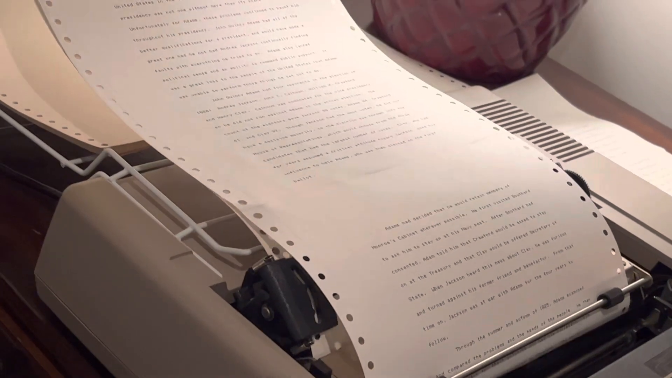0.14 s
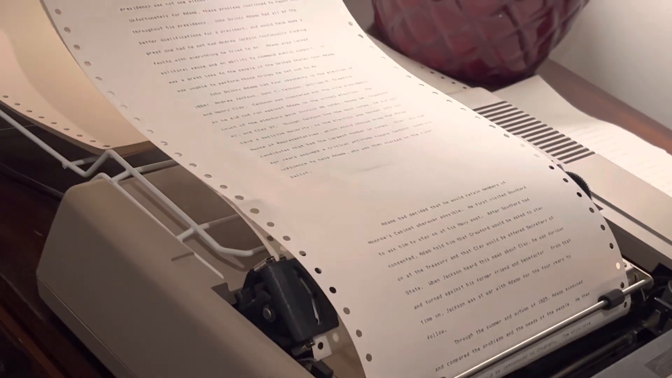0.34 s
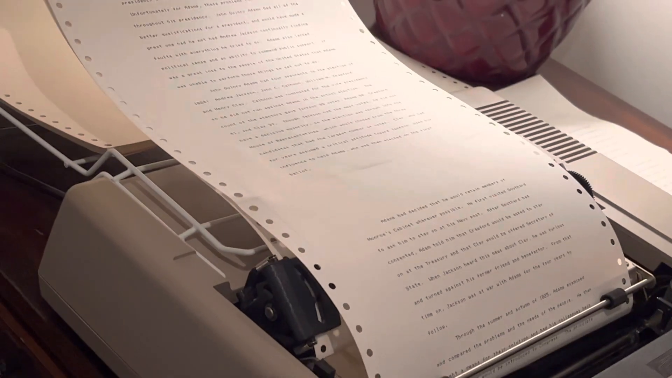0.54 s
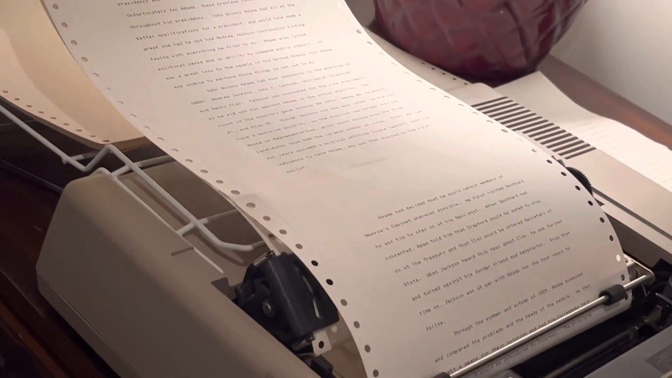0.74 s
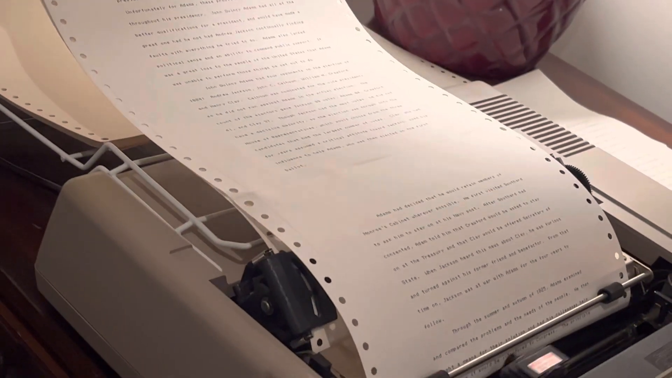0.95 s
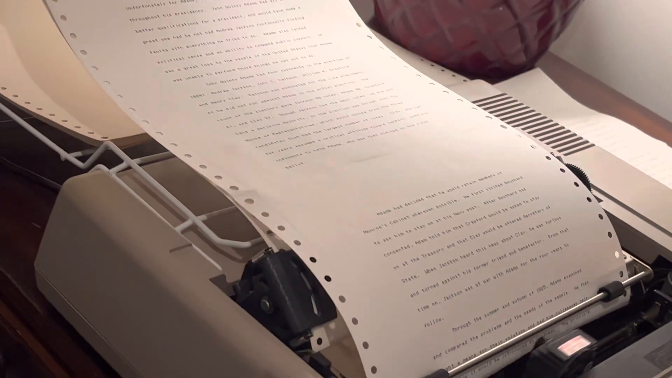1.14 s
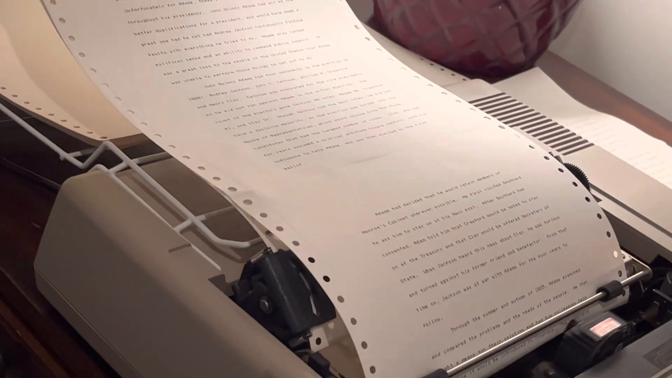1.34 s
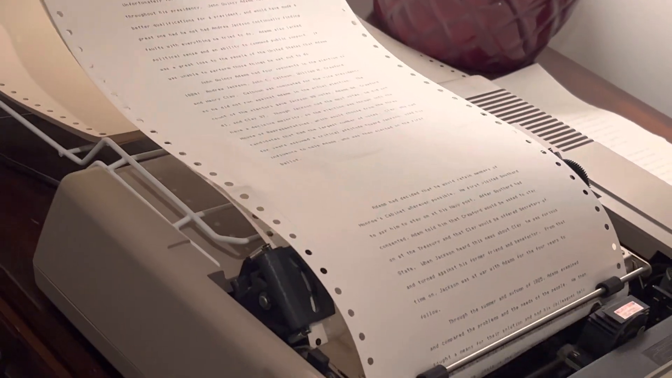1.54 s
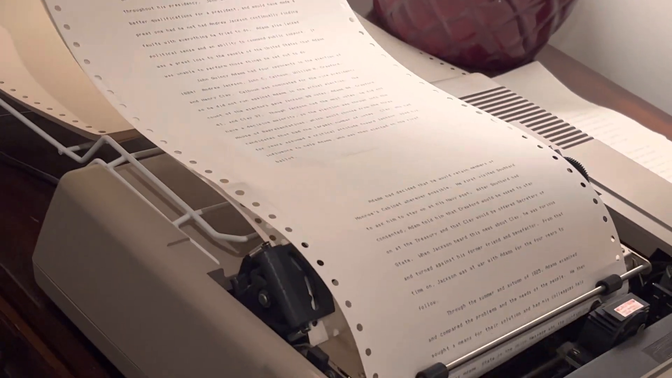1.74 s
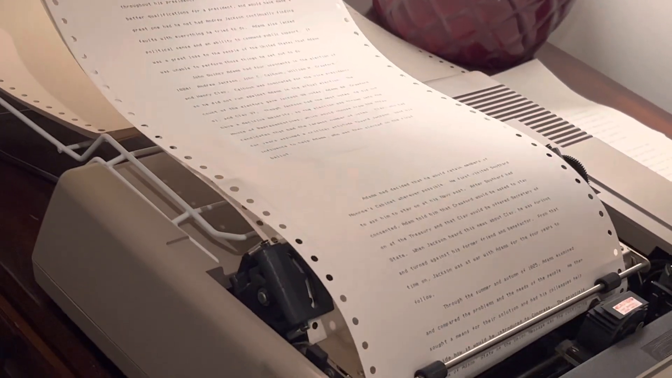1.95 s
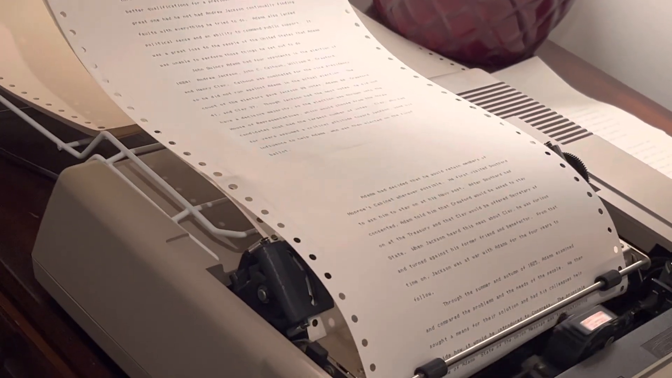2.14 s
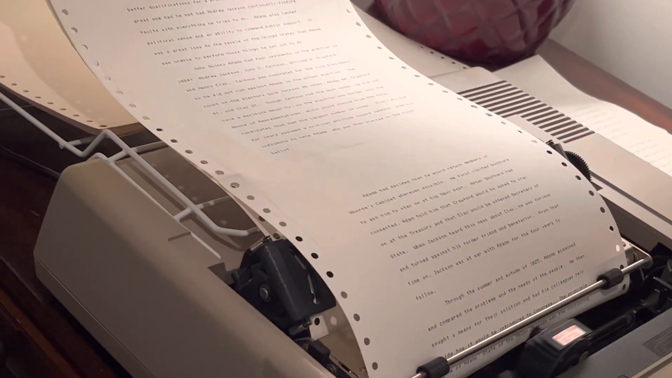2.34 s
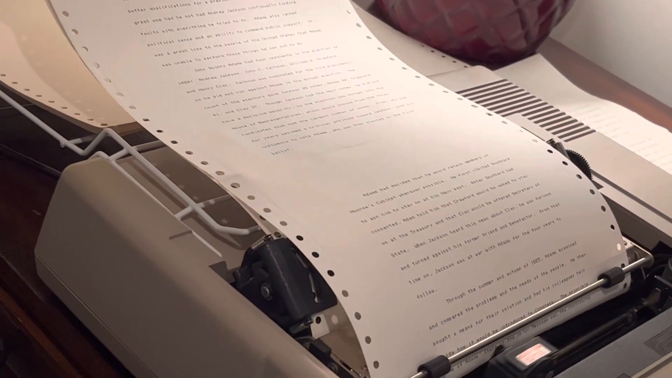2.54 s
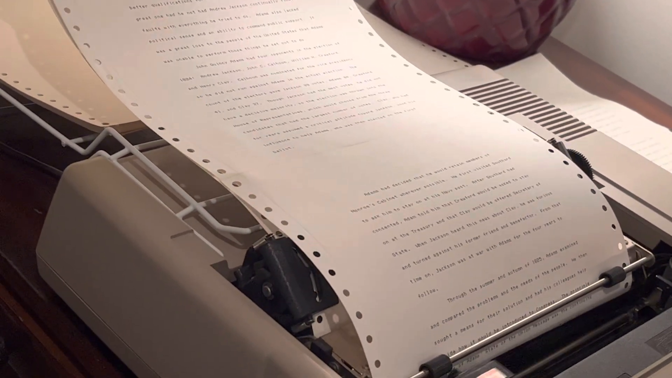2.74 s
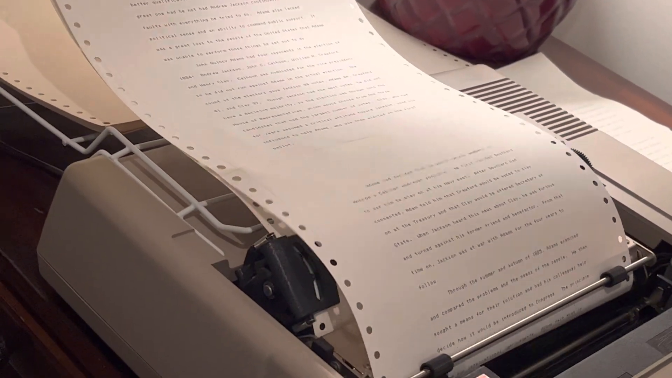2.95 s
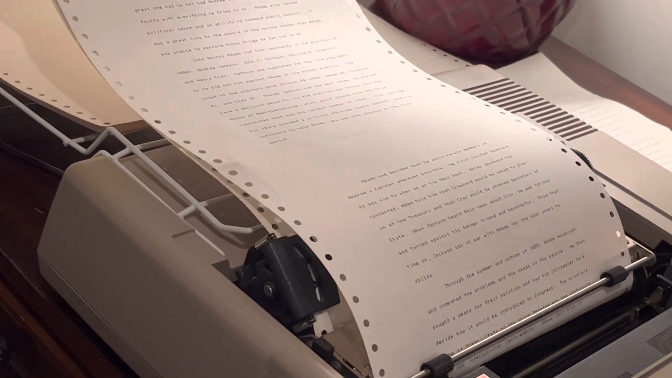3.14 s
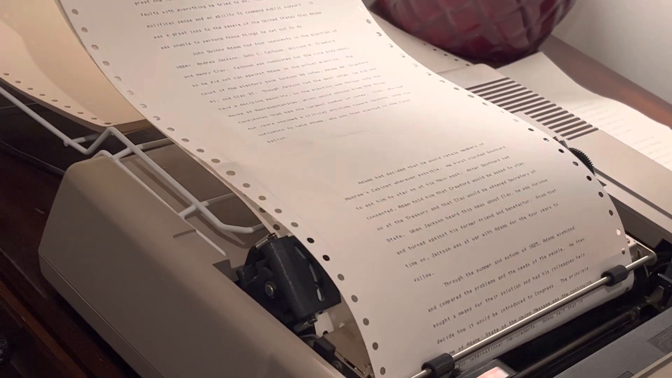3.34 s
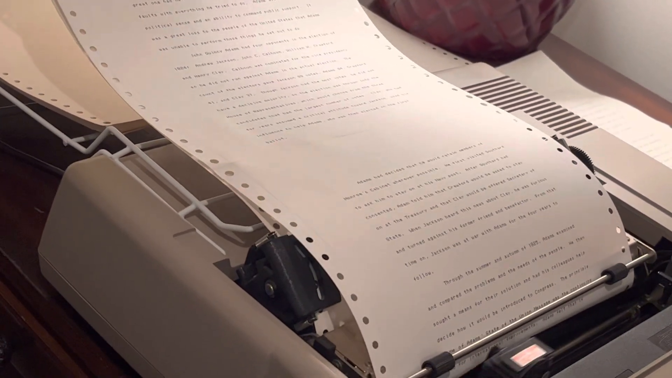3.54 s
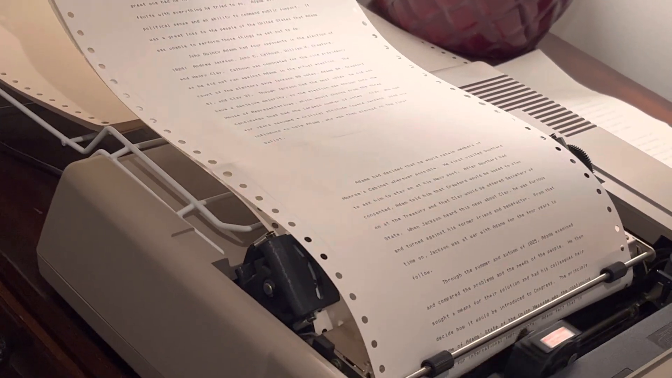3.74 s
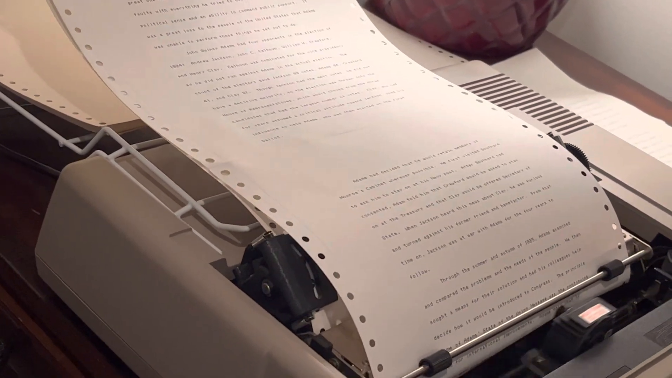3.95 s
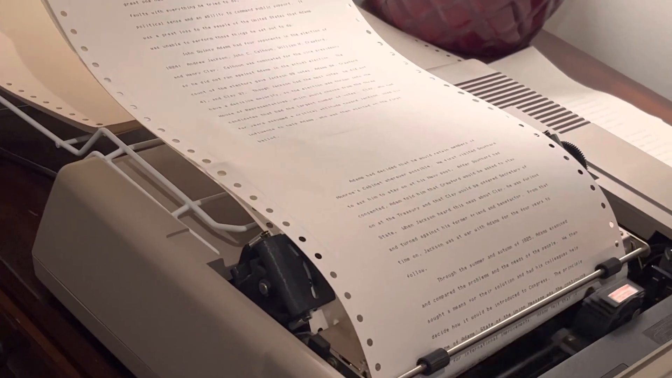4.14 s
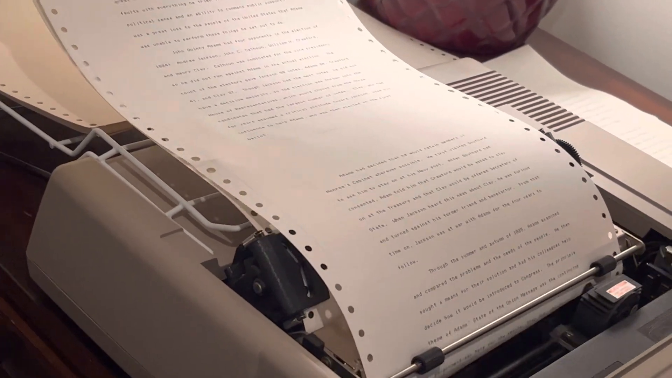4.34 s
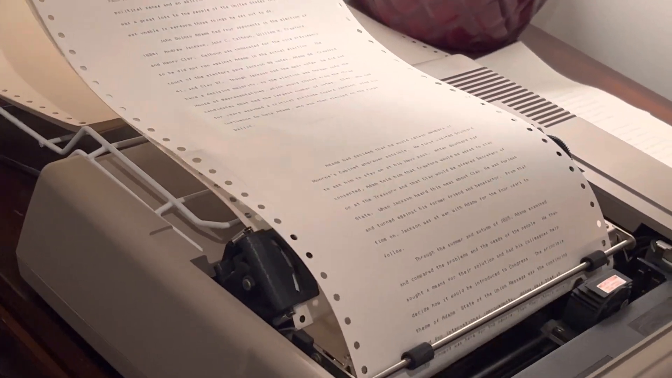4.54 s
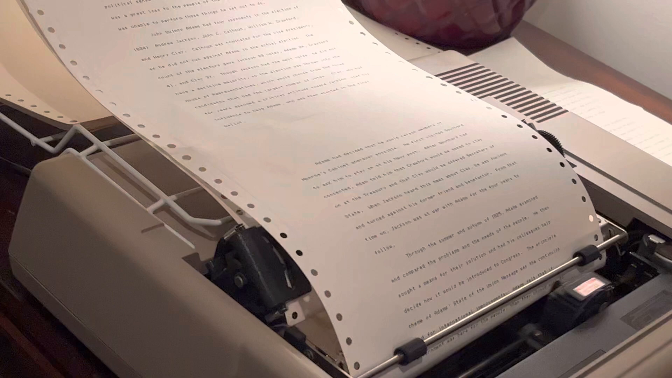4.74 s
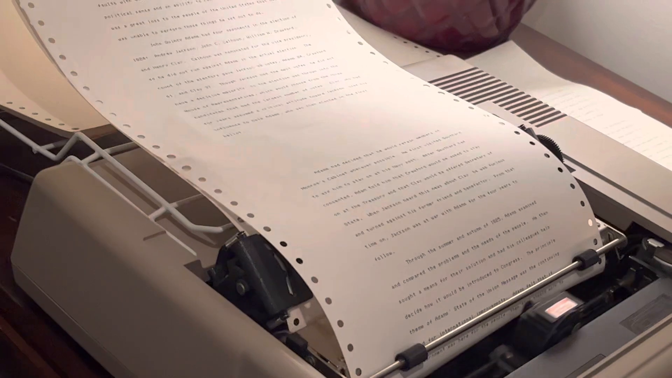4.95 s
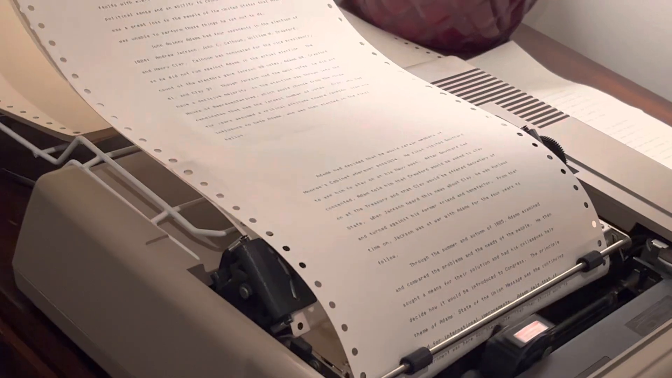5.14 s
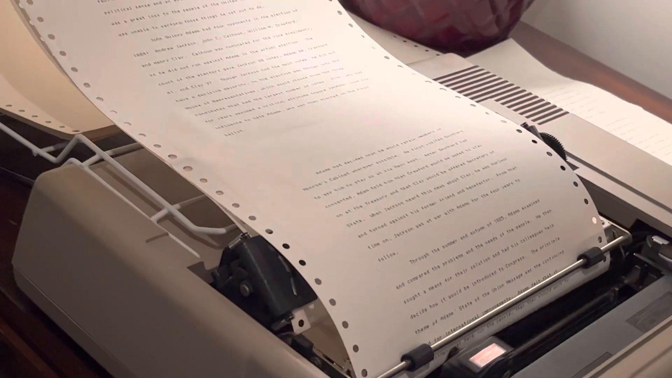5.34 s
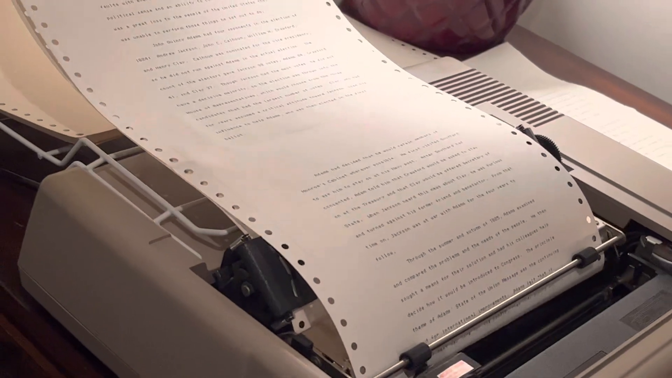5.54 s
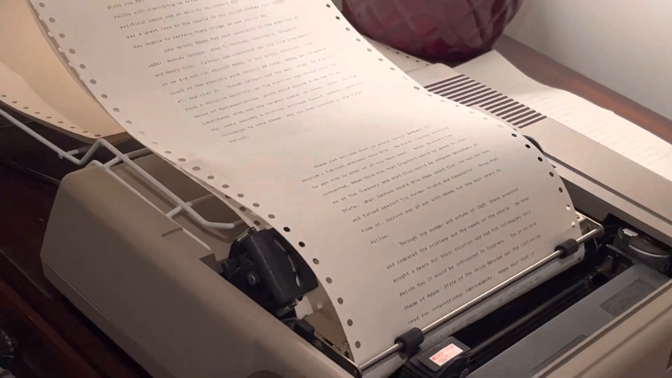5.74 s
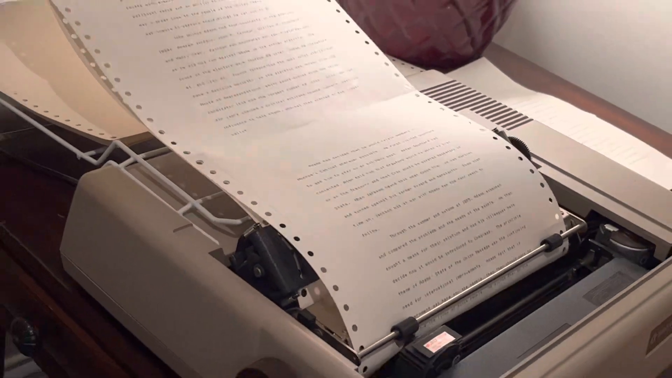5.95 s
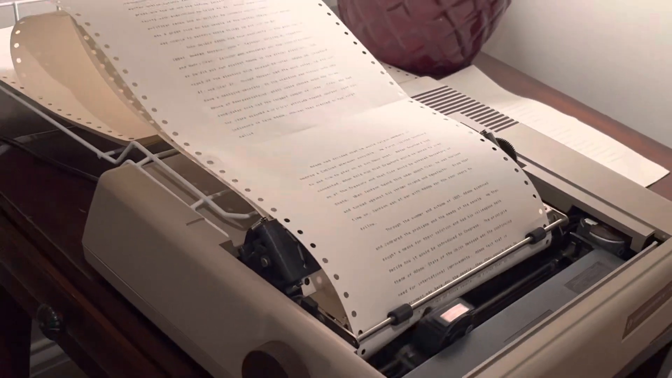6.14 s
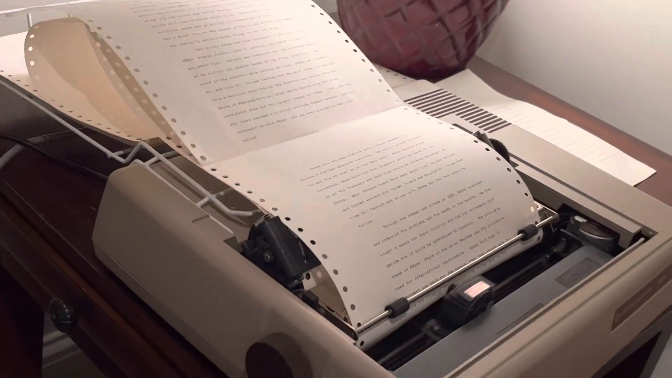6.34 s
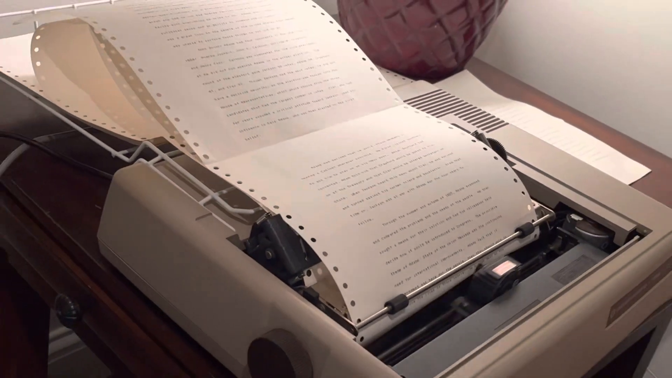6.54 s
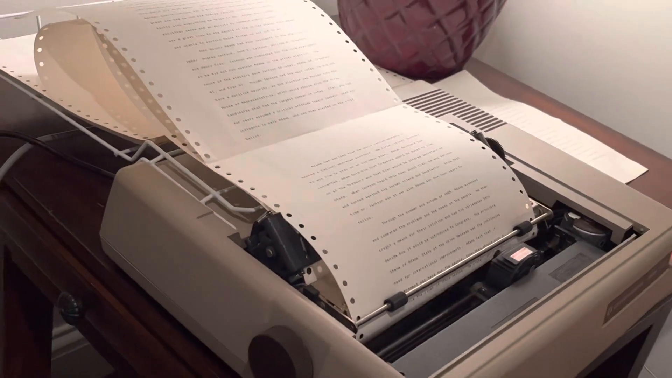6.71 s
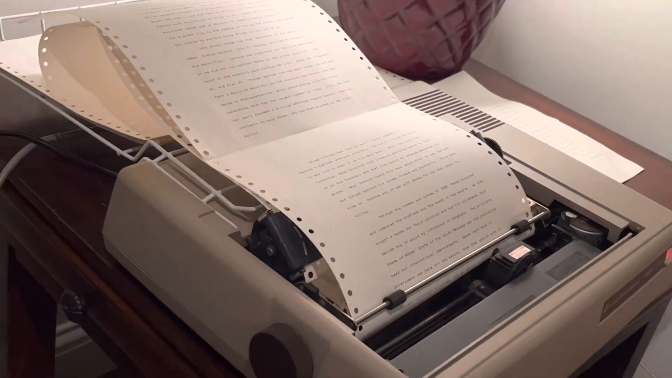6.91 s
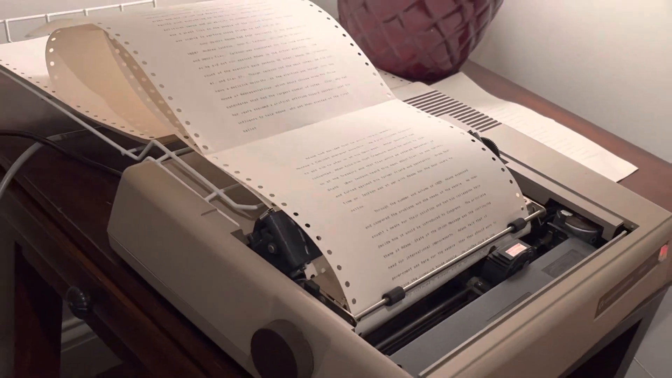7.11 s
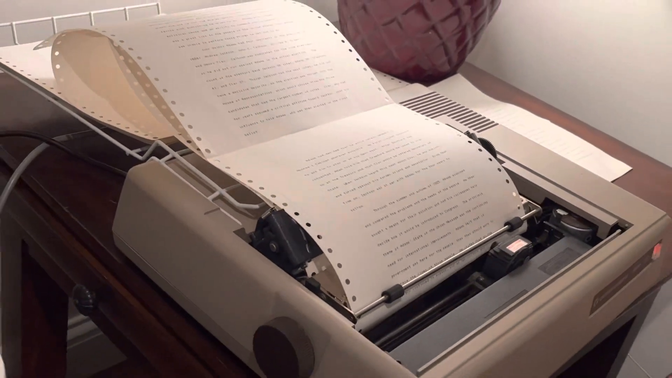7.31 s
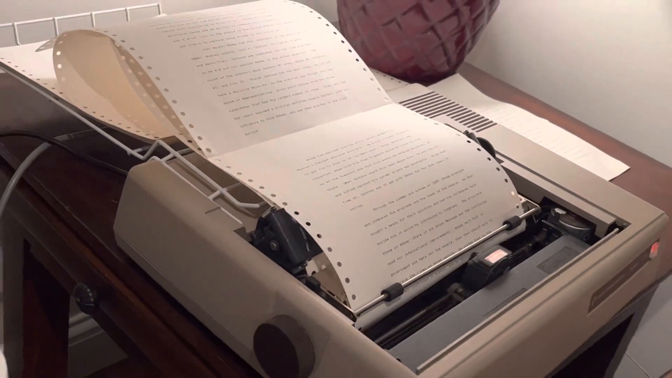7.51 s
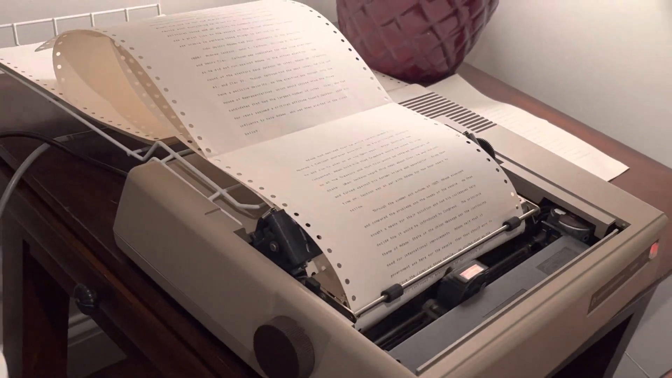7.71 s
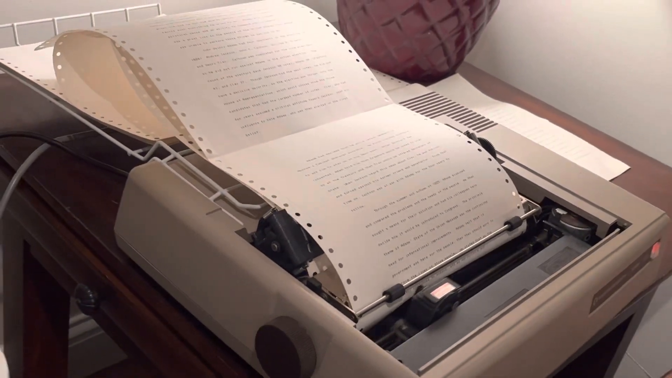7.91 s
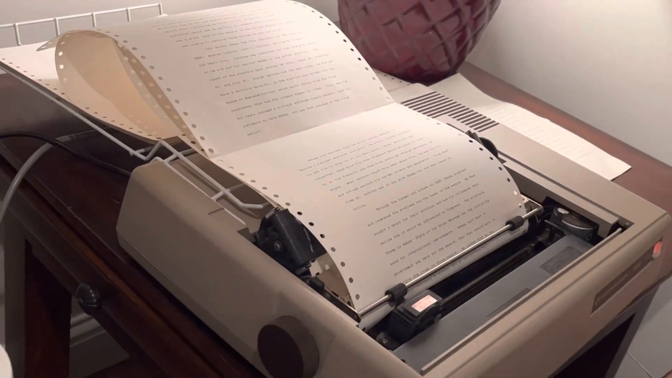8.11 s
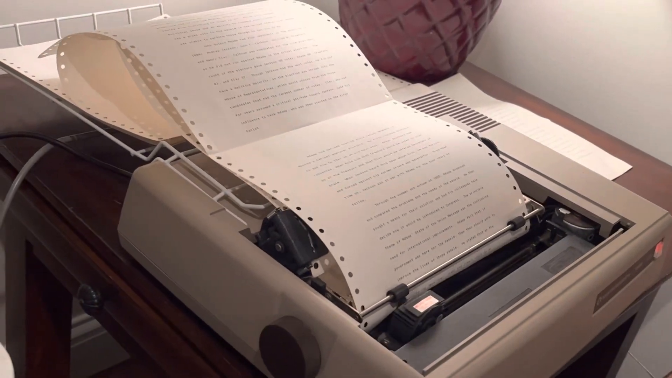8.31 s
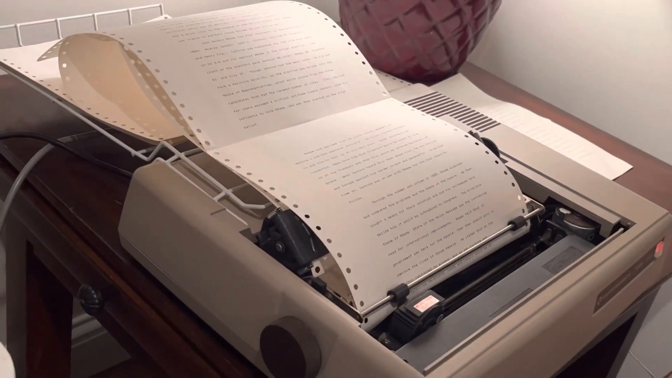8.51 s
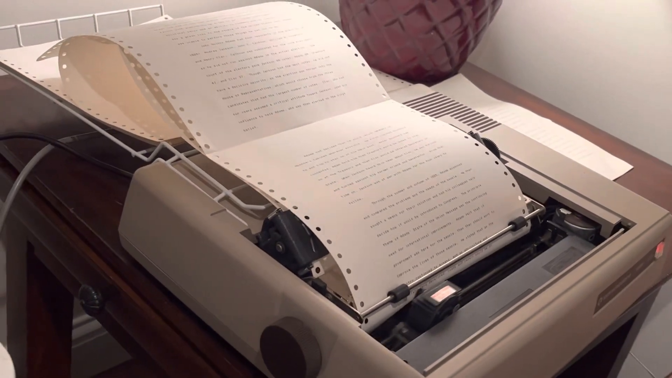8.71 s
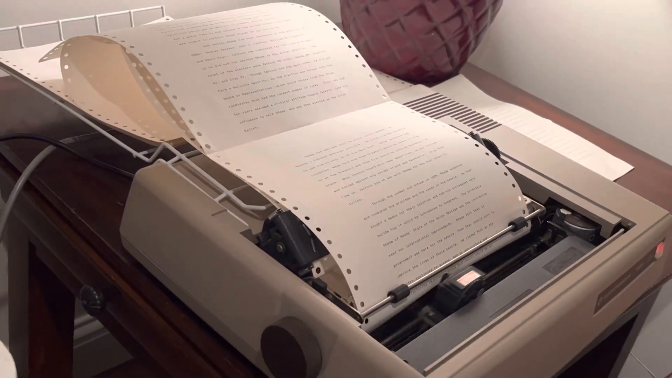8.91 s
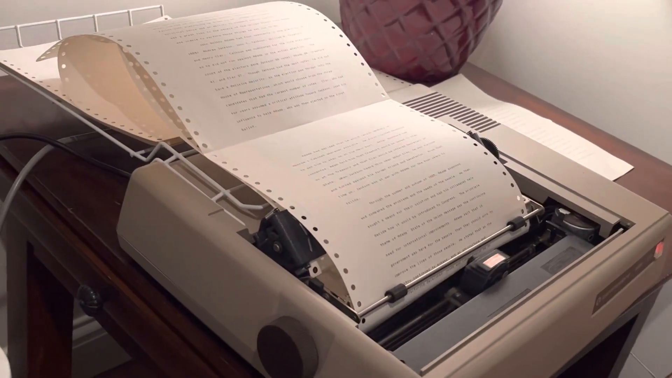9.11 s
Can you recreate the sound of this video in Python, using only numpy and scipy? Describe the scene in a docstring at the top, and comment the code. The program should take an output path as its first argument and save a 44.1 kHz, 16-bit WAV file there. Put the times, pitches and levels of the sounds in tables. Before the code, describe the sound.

A dot matrix printer works close to a stereo microphone in a quiet room with faint low rumble and hum. A very short burst of needle buzz opens, over by 0.1 seconds; carriage rustle and clicks follow, with a paper-feed hum around 0.3. Longer lines start near 0.6, 2.1, 3.3, 4.7, 6.0, 7.4 and 8.6 seconds, each lasting around 0.6 to 0.9 seconds. Each is a dense, hard, raspy metallic buzz, split by tiny gaps into uneven words whose ringing pitch varies. Between lines come a rustle of the drive, sharp gear and belt clicks, a feed hum of about 0.15 seconds, a brief lull and another click as the head sets off. From about 3.6 to 6 seconds the microphone is carried elsewhere, and the thin metal ringing gradually shifts in colour. Reflections are short and dull; the last line runs close to the end.

```python
"""A dot matrix printer on a wooden table, close to a stereo microphone in a quiet room with a low rumble and hum.
A short line is printed leftwards, then seven longer ones turn about: needle blows, word by word, crack and ring.
At each turn the drive rustles, gears and belt click, and the paper feed hums; then the next line starts.
Blows and clicks are short pulses or noise bursts through resonances; rustle and rumble are filtered noise.
As the microphone is carried to another place, the balance of the thin metal ringing slowly shifts."""
import sys
import numpy as np
from scipy import signal
from scipy.fft import rfft, irfft, next_fast_len
from scipy.io import wavfile
from scipy.ndimage import uniform_filter1d

SR = 44100
rng = np.random.default_rng(int(sys.argv[2]) if len(sys.argv) > 2 else 0)


def log_audio(samples):
    """Write samples as a 16-bit WAV file to the path given in sys.argv[1]."""
    # one column per channel
    frames = np.atleast_2d(samples).T
    # limit to full scale, then quantise
    limited = np.clip(frames, -1, 1)
    pcm = np.round(limited * 32767).astype(np.int16)
    wavfile.write(sys.argv[1], SR, pcm)


N = 408807
TIME = np.arange(N) / SR  # seconds

# All levels in the tables are relative: the functions add gains of their own.
# Room rumble, its tone colour: pitch_hz, level_db
ROOM_AIR = [(12, -21), (20, 5.5), (75, 6), (109, -6), (262, -22), (370, -8.5), (496, -28.5), (1110, -41.5),
            (4080, -33.5), (7000, -51.5), (9100, -87), (15400, -120)]
ROOM_AIR_DB = -58
# Transformer hum, bands of noise: pitch_hz, width_hz, level_db
MAINS = [(56, 8, -60), (121.4, 9.7, -59), (250, 71, -66.5)]

# Lines, printed leftwards and rightwards in turn: start_s (first full column is due), level_db
LINES = [(0.014, -23.5), (0.6251, -24.5), (2.0694, -24.5), (3.3389, -24), (4.7458, -24), (6.0137, -25),
         (7.3703, -24.5), (8.604, -25.5)]
# One list a line: letters in each word, with a blank cell after each; 0 is a second blank
TEXT = [
    [6],
    [5, 2, 6, 5, 2, 3, 5, 7, 3, 3, 10],
    [2, 4, 4, 5, 0, 13, 13, 3, 4],
    [10, 3, 4, 3, 3, 7, 4, 4, 6, 4, 2],
    [3, 2, 4, 6, 2, 0, 7, 5, 2, 5, 3, 7],
    [7, 9, 2, 7, 3, 2, 11, 3],
    [2, 2, 5, 6, 3, 5, 10, 13],
    [10, 7, 0, 5, 8, 3, 4, 2, 1],
]
LEFTWARDS_LETTERS_PER_S, RIGHTWARDS_LETTERS_PER_S = 75.7, 72.1
# Turns at a margin: feed_start_s, carriage_start_s
TURNS = [(.2925, .6033), (1.6707, 1.9821), (3.0047, 3.316), (4.372, 4.6833), (5.6957, 5.9923),
         (6.9236, 7.227), (8.2675, 8.5813)]
FEED_S = 0.155  # how long the paper is pulled on

# Steady tones of the feed motor's steps: pitch_hz, level_db
FEED_TONES = [(117.5, -56), (352, -53.5)]
# Drive loudness during every turn: moment (name), after_s, rustle_db, hum_db
TURN_SHAPE = [("line ends", 0.037, -36.5, -45), ("line ends", 0.074, -52.5, -43),
              ("feed", -0.0068, -54.5, -51), ("feed", .01, -50, -44.5), ("feed", 0.06, -54, -45.5),
              ("feed stops", -0.0016, -53.5, -47.5), ("feed stops", 0.017, -56.5, -49),
              ("feed stops", 0.064, -75, -57), ("sets off", -0.018, -76, -90),
              ("sets off", 0.0088, -49, -50), ("line starts", -0.0072, -51, -49),
              ("line starts", 0.02, -40, -47.5)]
# Tone colour of paper and belt rustle: pitch_hz, level_db
RUSTLE = [(400, -1), (800, 4), (1500, 6), (2800, 0.5), (4000, -5), (6000, -5.5), (8000, -9.5), (11000, -21),
          (16000, -8)]
# Hum of the stepping motors in the case: pitch_hz, width_hz, level_db
MOTOR = [(158, 49, 0), (343.8, 18.5, -1), (438.3, 44, -1), (517, 65, -13.5), (660, 65, -7.5),
         (766, 47, -9.5), (1820, 70, -10.5)]
# What the drive rattle rings: pitch_hz, width_hz, level_db
GEAR_RINGS = [(1732, 140, -10.5), (2825, 140, -11), (3420, 120, -18)]

# Belt takes up slack: time_s, level_db, pitch_hz
BELT = [(0.202, -32, 2910), (.615, -22, 3000), (3.328, -23.5, 3000), (6.004, -24, 3000),
        (8.594, -21.5, 2980), (1.695, -30.5, 997), (1.6445, -29, 2840), (1.505, -34.5, 2610),
        (1.733, -31.5, 1540), (1.802, -33.5, 2790), (2.0053, -25.5, 3010), (4.7002, -23.5, 2740),
        (5.5153, -17, 4940), (5.5544, -25, 2010), (6.757, -22, 4970), (7.0847, -26, 2740),
        (7.2973, -19.5, 5070), (7.3214, -22, 5230), (7.34, -24.5, 2770)]
# Carriage stops at the left margin just before the feed: time_s, level_db, pitch_hz
CARRIAGE_STOPS = [(.2591, -25, 2860), (2.9726, -25, 2870), (5.6624, -25.5, 2900), (8.2336, -27, 4000)]
# Clicks of each turn: feed_db, feed_hz, feed_stop_db, feed_stop_hz, setting_off_db, setting_off_hz
TURN_CLICKS = [(-23, 2500, -35, 2400, -27.5, 3090), (-25, 2200, -25.5, 2600, -26, 6400),
               (-28, 2400, -30, 3060, -28, 3040), (-27, 2850, -23.5, 2730, -25, 6500),
               (-28, 1800, -31, 1810, -25, 3010), (-26.5, 4800, -32, 2000, -31, 4510),
               (-22.5, 5000, -36, 1600, -28, 2000)]

CELL = 16  # half-dot steps to a letter, gap included
EDGE = 2  # half steps from the edge of a cell to the first full column
# Ink of a letter, one level_db per half step: full columns (even) and weaker half steps (odd)
COLUMN_DB = [-6, -6, -0.5, -10, -3, -12, -3, -12, -3, -12, -2, -15]
# Where each word starts and what it rings: first_blow_halfsteps, platen_hz, head_hz, guide_hz
WORDS = [(3, 1210, 2910, 3910), (2, 1170, 3110, 3890), (1, 1310, 3440, 4680), (1, 1560, 2580, 5630),
         (2, 1140, 2680, 3700), (3, 1150, 2730, 4620), (3, 1150, 3030, 4900), (3, 1150, 3040, 3720),
         (3, 1330, 2990, 4210), (2, 1340, 3050, 5000), (2, 1170, 3080, 4140), (1, 1170, 3670, 3700),
         (2, 1220, 2840, 3920), (2, 1220, 2950, 4230), (1, 1190, 2750, 4100), (2, 2210, 2860, 5030),
         (3, 1200, 2830, 5090), (4, 1350, 2770, 4160), (2, 1310, 2770, 4210), (2, 1270, 2830, 4190),
         (1, 1310, 3110, 5210), (1, 1310, 3510, 4230), (2, 1320, 3230, 4300), (3, 1310, 3420, 4450),
         (3, 1310, 2730, 5100), (3, 1150, 3030, 4200), (3, 1150, 2980, 4180), (3, 1350, 2990, 4200),
         (2, 1180, 3230, 3940), (2, 1190, 3030, 3700), (1, 1310, 3520, 3940), (0, 1230, 2840, 4860),
         (2, 1200, 3370, 4380), (1, 1200, 3520, 4190), (2, 1200, 2870, 4180), (1, 1230, 2870, 4730),
         (3, 1790, 2870, 4190), (2, 1160, 2840, 4960), (2, 1690, 2630, 5040), (1, 2190, 2870, 4750),
         (1, 1780, 2830, 4190), (2, 1290, 3380, 4440), (2, 1330, 3320, 4000), (1, 1730, 2810, 4190),
         (2, 1150, 2680, 5070), (2, 1860, 3030, 4980), (2, 1720, 2780, 5170), (2, 2150, 2970, 4470),
         (2, 1890, 3040, 4190), (2, 1720, 3150, 5010), (0, 2130, 3360, 3940), (2, 1680, 2950, 4190),
         (2, 1190, 2570, 4190), (3, 1690, 2840, 4190), (2, 1680, 2820, 4190), (2, 1770, 2800, 4800),
         (3, 1680, 2830, 4750), (2, 1680, 2800, 4510), (5, 1720, 3110, 5430), (1, 1740, 2810, 4180),
         (1, 1160, 3070, 4870), (1, 1160, 3060, 4420), (2, 2170, 2990, 4190), (1, 1890, 3030, 4200),
         (1, 1180, 3040, 4200), (1, 2090, 2650, 4210)]
# How hard each word lands and rings: ink_db, platen_db, head_db, guide_db
WORD_DB = [(-1, -9, 1.5, -9.5), (-1, -11.0, 3.5, -14.5), (1, -13.5, -6, -11), (0, -6, -10, -12),
           (1.5, -2.5, -11, -13), (1.5, -5, -10.5, -1), (2, -8, -9, -8), (-0.6, -16, 2, -6),
           (1, -14.5, -8.5, -6), (1, -10.5, -8, -7), (1.5, -9.5, -7, -9), (-0.5, 1.5, -10.5, -9),
           (1, -1, -6.5, -2.5), (2, -8.5, -1, -11), (-1.5, -5, -10, -9), (0.6, -7.5, -6.5, -9.0),
           (-0.5, -13, -0.5, -11), (1, -8, -9, -14), (1.5, -6.5, -3.5, -8), (-1, -10, 2, -12.5),
           (-0.9, -5, -2.5, -8.5), (1, -5, -7, -10), (1.2, -10, -8, -10), (1.5, -6, -1, -8.5),
           (1.6, -9, -10.5, -1), (0.5, -17, -3.5, -6), (0.4, -9, -7.5, -14), (0.8, -8, -8, -7),
           (0.8, -7.5, -4, -14), (2, -7.5, -1, -4.5), (2.7, -4, -7.5, -1), (3, -5, -2, -10.5),
           (1, -2.5, -11, -10.0), (0, -4.5, -9, -16.5), (-2, -10.5, -14.5, -0.5), (0.3, -11, -4.5, -12),
           (-1.5, -1, -7, -13.5), (-0.8, -13, -11, -0.5), (0.3, -6.5, -9, -10), (-1.5, -10, -14, -2.5),
           (1.5, -2.5, -12, -6), (-0.7, -4, -11, -12), (-0.3, -12, -13.5, -11.5), (-1.5, 1, -13, -15),
           (0.9, -9, -16, -10), (0.8, -7, -17, -2), (1, -21, -5, -8), (0.5, -7, -4, -6),
           (-0.5, -10.5, -12, -3.5), (2.5, -4, -2, -11.5), (0.1, -14, 7.5, -7.5), (0.5, -7, 4, -3),
           (-1, -4.5, -4, -6.5), (1.5, -15, -3, -7), (-0.5, -12, -2, -2), (1, -17, -11, -1.5),
           (-0.5, -5, -5, -9.0), (-0.2, -6, -14, -8), (0.6, -4.5, -13, -7), (0, 6.5, -11.5, -10),
           (2, -15.5, -11, -10), (0.4, -16, -3, -12.5), (0.7, -17, -2, -10), (-0.8, -18.5, -12, -0.5),
           (0.5, -8.5, -7.5, -3), (2, -8, 1, -8)]
WOBBLE_S, WOBBLE_HZ = .0006, 7  # the belt lets the head run a little ahead and behind
NEEDLES, NEEDLE_SPREAD_S = 3, .0003  # needles of one column do not land together
FLUTTER_DB, FLUTTER_T60_S = -30.5, .05  # paper and ribbon shake on after a blow

# Tone colour of the crack of a blow: pitch_hz, level_db
CRACK = [(100, -22.5), (300, -40.5), (900, -12), (2200, -6), (4000, -5), (5800, -6), (7000, -9.5),
         (9500, -13.5), (10800, -17), (13000, -14.5), (16000, -15)]
# Platen and frame, head, guide, one row each: width_hz, level_db
RINGS = [(90.5, -6.5), (150, -5), (100, -4)]
# Ringing of the case: pitch_hz, width_hz, level_db
PLATES = [(450, 140, -35.5), (635, 27, -26.5), (964, 51, -39.5)]
# Thin modes of the metal parts: pitch_hz, width_hz, level_db, swing_db, crest_letters (from the margin),
# crest_spacing_letters, leftwards_db (added), moved_db (added once the microphone has moved)
METAL = [(1171, 34, -19, 7, 17.7, 42, -1.5, -6), (1237, 17, -26, 10.5, 59, 71, 6, -9.5),
         (1320, 25.5, -13, 7, 5.5, 53, -1, -1), (1550, 34, -16, 10.5, 12.5, 46, -1.5, -17.5),
         (1716, 41, -17.5, 4, 8.5, 65, 2.5, 7.5), (1876, 38, -15.5, 2.5, 15, 41, 0, 3.5),
         (2195, 28, -20.5, 2.5, 9.4, 55, 4, 6.5), (2555, 21, -25, 14.5, 1.5, 72, -3, 0.5),
         (2747, 46, -15, -2.5, 35, 56, -1.5, 0.5), (2888, 64, -17.5, 7, 28.5, 27.7, 2, 2),
         (3037, 67, -15.5, 8.5, 35, 48, -8.5, -1.5), (3280, 280, -18, 12.5, 56.4, 58.7, 0.5, 1.5),
         (4146, 30, -22, 1.5, 40, 60, 2, 9), (4540, 55, -25, 5, 32, 43, -1.7, 9.5),
         (4880, 91, -29, 8, 24, 43, 2.5, 11.5), (5140, 59, -29.5, 3, 21, 28, 1, 8)]
MOVE_START_S, MOVE_END_S = 3.6, 6.06  # the microphone is carried from one place to the other

# Left and right channels, likeness and balance by pitch: pitch_hz, likeness (0 to 1), right_louder_db
STEREO_LIKENESS = [(100.5, 0.91, 2), (1150, 0.86, 1.5), (1700, 0.17, 4), (2700, 0.88, 2.5), (3980, 1, -0.5),
                   (5340, 0.95, 0.5), (6660, 0, 0.5), (7940, 1, -1.5), (9180, 0.98, 2.5),
                   (10400, 0.18, -0.5), (11600, 0.95, -0.5), (12300, 1, -0.5), (13800, 0.3, 2),
                   (14400, 0.99, -1)]
# Stereo image, phase turn of the right channel against the left: pitch_hz, turn_halfturns
STEREO_PHASE = [(5100, 0), (6600, .27), (7700, 1), (8900, 1), (11000, 2), (12900, 2), (14600, 3)]
TOP_HZ = 15760  # upper edge of the sound


def undb(db):
    """Turn decibels into a plain multiplier."""
    return 10 ** (np.asarray(db) / 20)


def level(x, db):
    """Scale a sound to an average (RMS) level in dB."""
    return x * undb(db) / np.sqrt(np.mean(x ** 2))


def ring(x, hz, width):
    """Two-pole resonance, gain 1 at the centre; a narrow one rings longer."""
    return signal.lfilter(*signal.iirpeak(hz, hz / width, SR), x)


def colour(x, table):
    """Shape the tone with (Hz, dB) points, using a filter that never sounds ahead of its input."""
    hz, db = np.transpose(table)
    log_grid_hz = np.log(np.linspace(1, SR / 2, 2049))
    gain = undb(np.interp(log_grid_hz, np.log(hz), db))
    # folding the cepstrum onto positive times makes the filter causal
    cepstrum = irfft(np.log(gain))
    cepstrum[1:2048] *= 2
    cepstrum[2049:] = 0
    return signal.fftconvolve(x, irfft(np.exp(rfft(cepstrum))))[:len(x)]


def fade(x, t60):
    """Each impulse becomes an envelope that falls by 60 dB in t60 seconds."""
    return signal.lfilter([1], [1, -np.exp(-np.log(1000) / (t60 * SR))], x)


def walk(rate):
    """Random levels, rate new ones a second, with smooth slopes between them."""
    hold = int(SR / rate)
    steps = np.repeat(rng.standard_normal(N // hold + 1), hold)
    return uniform_filter1d(steps, hold)[:N]


def layout():
    """Words as (start s, level dB, letters, letters a second), and lines as (start s, end s)."""
    words, spans = [], []
    for k, ((start, db), text) in enumerate(zip(LINES, TEXT)):
        speed = RIGHTWARDS_LETTERS_PER_S if k % 2 else LEFTWARDS_LETTERS_PER_S
        cells = np.cumsum([0] + [letters + 1 for letters in text])
        spans.append((start, start + (cells[-1] - 1) / speed))
        for cell, letters in zip(cells, text):
            if letters > 0:
                words.append((start + cell / speed, db, letters, speed))
    return words, spans


def room_tone():
    """Noise coloured into the low rumble of the house, and narrow noise as a wavering transformer hum."""
    hum = sum(level(ring(rng.standard_normal(N), hz, width), db) for hz, width, db in MAINS)
    return hum + level(colour(rng.standard_normal(N), ROOM_AIR), ROOM_AIR_DB)


def room(x, t60=0.11, wet_db=-12):
    """Table, walls and furniture send back a short dull tail, made of fading noise."""
    t = TIME[:int(.4 * SR)]
    noise = rng.standard_normal(len(t)) * np.exp(-np.log(1000) * t / t60)
    tail = colour(noise, [(300, 3.0), (3000, -4.0), (12000, -6.5)])
    return x + undb(wet_db) * signal.fftconvolve(x, tail / np.linalg.norm(tail))[:N]


def feed_motor(rise_s=0.046, fall_s=0.057, waver_db=5.0):
    """Steady motor steps make tones that swell while the paper is pulled on."""
    on = sum(np.interp(TIME, [s, s + rise_s, s + FEED_S, s + FEED_S + fall_s], [0, 1, 1, 0])
             for s, _ in TURNS)
    tones = sum(undb(db + waver_db * walk(23)) * np.sin(2 * np.pi * hz * TIME) for hz, db in FEED_TONES)
    return on * tones


def drive(grains, grain_db=2.5, waver_db=4.0, surge_db=3.0, step_db=2.5):
    """Paper and belt rustle in grains while the stepping motors hum unevenly in the case."""
    spans, points = layout()[1], []
    for (feed, off), (_, end), (start, _) in zip(TURNS, spans, spans[1:]):
        when = {"line ends": end, "feed": feed, "feed stops": feed + FEED_S,
                "sets off": off, "line starts": start}
        points += [(when[moment] + after, *dbs) for moment, after, *dbs in TURN_SHAPE]
    point_s, rustle_db, hum_db = np.transpose(sorted(points))

    # the rattle grows and shrinks with the motor steps
    steps = np.cos(2 * np.pi * FEED_TONES[0][0] * TIME)
    rattle_db = grain_db * grains + surge_db * walk(25) + step_db * steps
    rattle = rng.standard_normal(N) * undb(rattle_db)
    rustle = level(colour(rattle, RUSTLE), 0)
    for hz, width, db in GEAR_RINGS:
        rustle = rustle + level(ring(rattle * undb(waver_db * walk(30)), hz, width), db)

    hum = 0
    for hz, width, db in MOTOR:
        band = ring(rng.standard_normal(N), hz, width) / np.sqrt(width)
        hum = hum + undb(db + waver_db * walk(14)) * band
    hum = level(hum, 0)
    return rustle * undb(np.interp(TIME, point_s, rustle_db)) + hum * undb(np.interp(TIME, point_s, hum_db))


def clicks(t60=0.12, tick_t60=0.017, tick_db=4, rise_s=0.00072, ring_db=-1.5, width=300,
           body_db=-4.0, knock_db=-5):
    """A sharp tick, then a burst of rattle with a ring of its own and a knock in the case."""
    out, t = np.zeros(N), TIME[:int(.08 * SR)]
    shape = np.exp(-np.log(1000) * t / t60) + undb(tick_db) * np.exp(-np.log(1000) * t / tick_t60)
    shape = shape * (1 - np.exp(-t / rise_s))
    ticks = BELT + CARRIAGE_STOPS
    for (feed, off), (feed_db, feed_hz, stop_db, stop_hz, off_db, off_hz) in zip(TURNS, TURN_CLICKS):
        ticks += [(feed, feed_db, feed_hz), (feed + FEED_S, stop_db, stop_hz), (off, off_db, off_hz)]
    for s, db, hz in ticks:
        burst = rng.standard_normal(len(t)) * shape
        rattle = level(colour(burst, RUSTLE), 0)
        knock = level(ring(burst, 720, 300), knock_db)
        mixed = rattle + level(ring(burst, hz, width), ring_db) + knock
        out[int(s * SR):int(s * SR) + len(t)] += undb(db + body_db) * mixed / np.abs(mixed).max()
    return out


def needles(column_db=2.0, scatter_s=.00005, idle=.18, idle_db=-12):
    """Needles strike on each word's column grid: (first sample, pulses with room for the tail)."""
    stroke_db = np.full(CELL, -np.inf)  # the steps after the ink are the gap between letters
    stroke_db[:len(COLUMN_DB)] = COLUMN_DB
    words = []
    for (s, db, letters, speed), (first, *_), (ink_db, *_) in zip(layout()[0], WORDS, WORD_DB):
        column = np.arange(letters * CELL)
        step = column % CELL
        timing, letter_kind, ink, dots = rng.uniform(-0.97, 1, (len(column), 4)).T
        letter_kind = letter_kind[column // CELL]  # one draw for a whole letter

        at, phase = column / (CELL * speed), np.pi * timing[0]
        wobble = WOBBLE_S * (np.sin(2 * np.pi * WOBBLE_HZ * at + phase) - np.sin(phase))
        at = at + wobble + scatter_s * (1 + timing)

        # columns differ in how many needles fire
        size = undb(db + ink_db + stroke_db[step] + column_db * ink)
        # thin letters leave their outer columns blank; only wide ones reach the first two
        size[(letter_kind < -.7) & np.isin(step, (0, 1, 2, 3, 10, 11))] = 0
        size[(letter_kind < .3) & (step < EDGE)] = 0
        size[(1 + dots) / 2 < idle] *= undb(idle_db)  # columns with a single dot
        # a word starts with a full blow
        size[:int(first)] = 0
        size[int(first)] = undb(db + ink_db)

        blows = np.zeros(int((at[-1] + .12) * SR))
        for late in NEEDLE_SPREAD_S * rng.random((len(column), NEEDLES)).T:
            np.add.at(blows, ((at + late) * SR).astype(int), size / np.sqrt(NEEDLES))
        words.append((int((s - EDGE / (CELL * speed)) * SR), blows))
    return words


def metal(strikes, metal_db=-1.5, letter_db=3.5):
    """Every strike rings the thin modes, each as strongly as the place and direction of the head allow."""
    out, moved = 0, np.interp(TIME, (MOVE_START_S, MOVE_END_S), (0, 1))
    place, leftwards = np.zeros((2, N))  # place counts letters from the left margin
    for k, (start, end) in enumerate(layout()[1]):
        on = TIME >= start
        if k % 2:
            place[on] = RIGHTWARDS_LETTERS_PER_S * (TIME[on] - start)
        else:
            place[on] = LEFTWARDS_LETTERS_PER_S * (end - TIME[on])
        leftwards[on] = 1 - k % 2
    for hz, width, db, swing_db, crest, spacing, left_db, moved_db in METAL:
        # changing needles favour other modes from moment to moment
        mode_db = db + metal_db + letter_db * walk(30)
        place_db = swing_db * np.cos(2 * np.pi * (place - crest) / spacing)
        gain = undb(mode_db + place_db + left_db * leftwards + moved_db * moved)
        out = out + np.sqrt(1000 / width) * ring(strikes * gain, hz, width)
    return out


def print_head(words, crack_db=24, spread_db=-18, ring_db=23, plate_db=44):
    """Each strike cracks, shakes paper and ribbon, and rings platen, head, guide, metal and case."""
    strikes, rings = np.zeros((2, N + SR))
    for (start, blows), (_, *pitches), (_, *levels) in zip(words, WORDS, WORD_DB):
        # noise smears each blow over a few milliseconds; the paper flutters on
        spread = undb(spread_db) * fade(blows, 0.0035)
        flutter = undb(FLUTTER_DB) * fade(blows, FLUTTER_T60_S)
        shaken = blows + (spread + flutter) * rng.standard_normal(len(blows))
        here = slice(start, start + len(blows))
        strikes[here] += shaken
        for hz, db, (width, part_db) in zip(pitches, levels, RINGS):
            part = ring(ring(shaken, hz, width), hz, 6 * width)
            rings[here] += undb(db + part_db) * np.sqrt(1000 / width) * part
    rings[:N] += metal(strikes[:N])
    plates = sum(undb(db) * ring(strikes, hz, width) for hz, width, db in PLATES)
    crack = undb(crack_db) * colour(strikes, CRACK)
    return (crack + undb(ring_db) * rings + undb(plate_db) * plates)[:N]


def scene():
    """Two paths to the microphone: same needle pulses and clicks, unrelated rattle and reflections."""
    words, gears, grains, motor = needles(), clicks(), walk(150), feed_motor()
    paths = []
    for _ in range(2):
        printer = room(print_head(words) + gears)
        paths.append(printer + drive(grains) + motor + room_tone())
    return np.array(paths)


def record(dry, delay_s=.002):
    """The right channel mixes the left path, turned in phase, with a delayed second path; bass and top are cut."""
    size = next_fast_len(N)
    f = np.fft.rfftfreq(size, 1 / SR)
    hz, like, right_db = np.transpose(STEREO_LIKENESS)
    like = np.interp(f, hz, np.clip(like, 0, 1))
    right_db = np.interp(f, hz, right_db)
    left, second = rfft(dry, size)
    delayed = second * np.exp(-2j * np.pi * f * delay_s)
    right = like * left + np.sqrt(1 - like ** 2) * delayed
    # the phase turn acts on the whole mix
    right = right * np.exp(1j * np.pi * np.interp(f, *np.transpose(STEREO_PHASE)))
    pair = irfft([left * undb(-right_db / 2), right * undb(right_db / 2)], size)[:, :N]
    # cut the deep bass, then the top
    pair = signal.sosfilt(signal.butter(4, 40, "high", fs=SR, output="sos"), pair)
    return signal.sosfilt(signal.ellip(10, .2, 75, TOP_HZ, fs=SR, output="sos"), pair)


dry = scene()
out = record(dry)
log_audio(out)
```